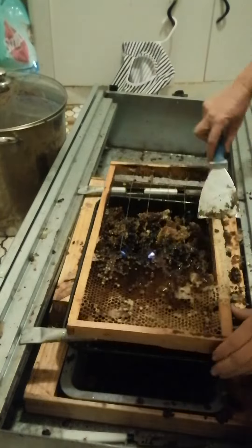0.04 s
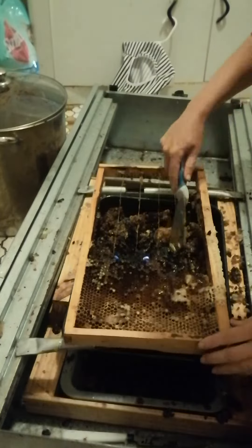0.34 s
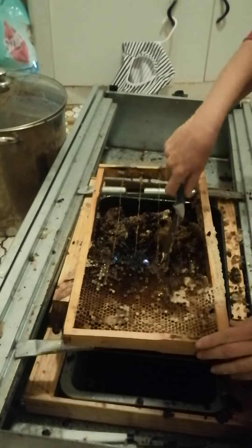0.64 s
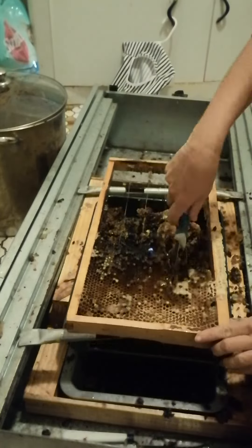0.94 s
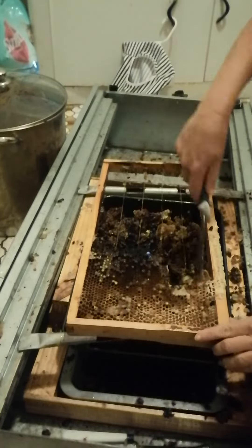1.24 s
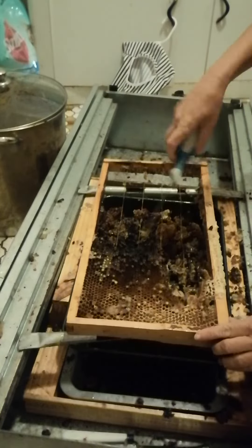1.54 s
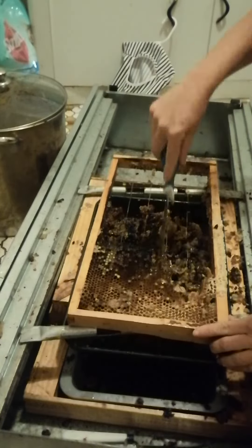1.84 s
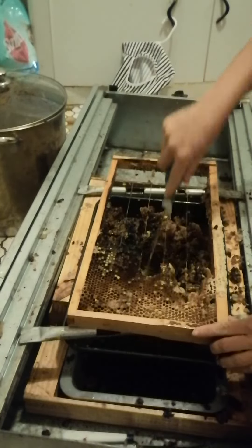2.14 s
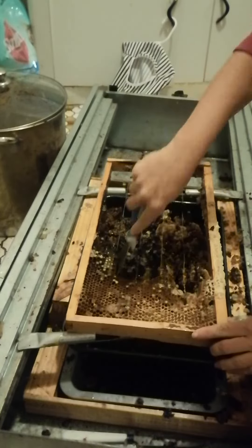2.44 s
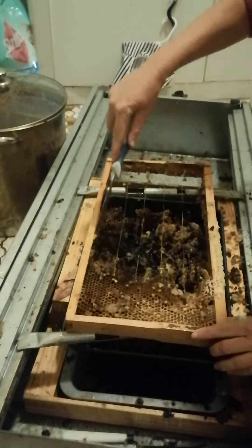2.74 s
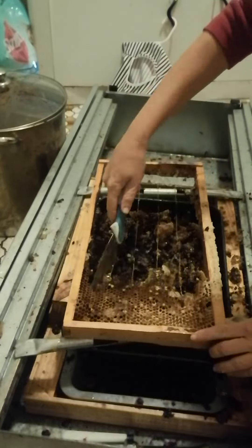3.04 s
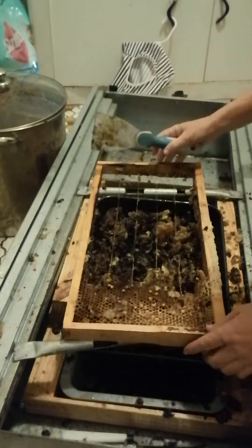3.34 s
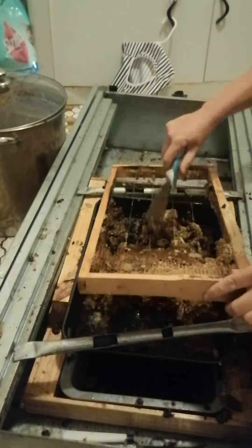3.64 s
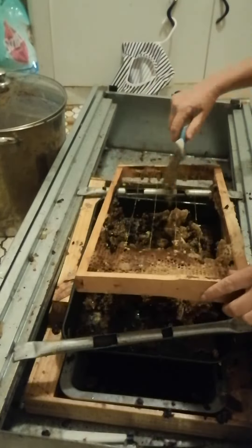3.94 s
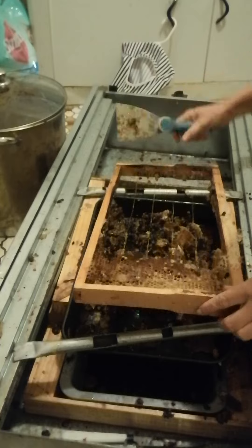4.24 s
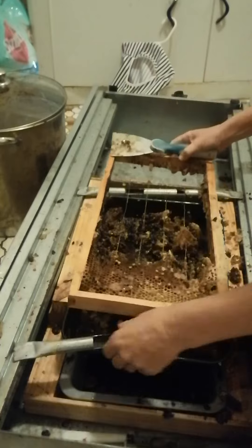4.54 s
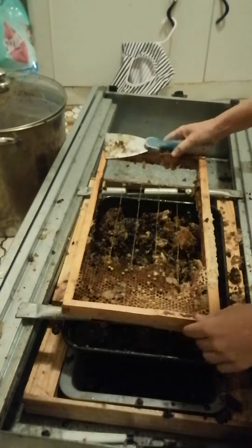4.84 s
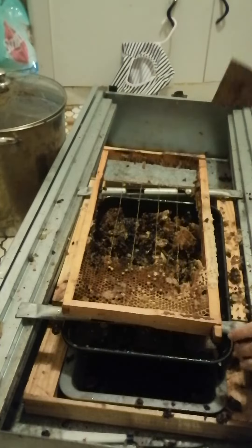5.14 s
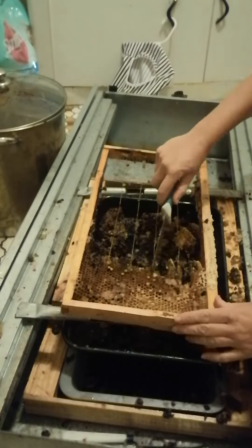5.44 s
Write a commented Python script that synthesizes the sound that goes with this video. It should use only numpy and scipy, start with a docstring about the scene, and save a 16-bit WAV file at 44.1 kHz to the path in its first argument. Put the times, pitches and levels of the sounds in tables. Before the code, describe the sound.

Old honeycomb crunches faintly as a blade cuts it from a wooden frame, with sharp clicks, clacks and dull thumps.

```python
"""Soft wooden bumps and crunching wax: a metal scraper cuts old comb out of a wired beehive frame,
over a tub in a kitchen. The blade snaps off the wires, clacks and knocks on the wood; each blow
is a few contacts and a short rattle ringing a resonant body. Wax crunches as trains of tiny
fractures and chirps by stick-slip. Crumbs drop, the frame bumps on its rests, and a prop slides
under it near the end. Faint appliance hum and room noise lie underneath."""
import sys
import numpy as np
from scipy import signal
from scipy.fft import rfft, irfft
from scipy.io import wavfile
from scipy.ndimage import uniform_filter1d

SR = 44100
rng = np.random.default_rng(int(sys.argv[2]) if len(sys.argv) > 2 else 0)


def log_audio(samples):
    """Write samples as a 16-bit WAV file to the path given in sys.argv[1]."""
    # one column per channel
    frames = np.atleast_2d(samples).T
    # limit to full scale, then quantise
    limited = np.clip(frames, -1, 1)
    pcm = np.round(limited * 32767).astype(np.int16)
    wavfile.write(sys.argv[1], SR, pcm)


N = 251370
EVENT_SAMPLES, LEAD_SAMPLES = 16384, 4096
EVENT_S = (np.arange(EVENT_SAMPLES) - LEAD_SAMPLES) / SR
EVENT_HZ, SCENE_HZ = np.fft.rfftfreq(EVENT_SAMPLES, 1 / SR), np.fft.rfftfreq(N, 1 / SR)
BLOW_SPLITS_HZ, WAX_SPLITS_HZ = (700, 3300), (3300, 7000)

# Event and curve levels are relative: each source adds its own gain.
# Blade blows: (time [s], thump [dB], ring [dB], crack [dB], rattle [dB], rattle t60 [s], L-R [dB])
SNAPS = [(1.1181, -26, -25.5, -38.5, -6.5, 0.043, -0.5), (1.2442, -46, -54, -71, 6, 0.052, 3),
         (1.5852, -60, -49.5, -56, 18, 0.011, 10), (1.8430, -27.5, -28, -40.5, -4.5, 0.042, 3),
         (2.0139, -26, -28.5, -38.5, -3.5, 0.047, 3.5), (3.3388, -50.5, -50, -53.5, 26, 0.045, 0.5)]
CLACKS = [(2.2912, -39, -28.5, -40.5, 0, 0.056, 7.5), (2.6075, -67, -50, -62, 16, 0.046, 0),
          (2.6997, -38, -30.5, -44.5, 0.5, 0.053, 0)]
KNOCKS = [(3.0945, -45, -32.5, -42, 6.18, 0.032, 0), (3.0978, -23, -20, -32.5, 1.5, 0.069, .9)]
# Contacts within a blow: (delay [s], force [relative])
SNAP_CONTACTS = [(0, -0.406), (.0013, 0.59)]
CLACK_CONTACTS = [(0, 0.96), (.0037, 1), (.0079, .65)]
KNOCK_CONTACTS = [(0, 0.81), (.003, 0.32), (.0072, .8), (0.0109, 0.64)]
# Tub, table and wall echoes: (left delay [s], right delay [s], gain [linear])
ECHOES = [(.0012, .00135, -0.71), (.0044, 0.0041, -0.41), (.0076, .0075, -.26), (0.013, .0111, -.2)]
# Blade skims wax: (time [s], length [s], crunch [dB], brightness [dB])
SKIMS = [(.294, .024, -77.5, 20), (0.414, 0.022, -70.5, 10.5), (0.484, 0.027, -67, -2.5),
         (.603, 0.052, -65, 5.5), (0.654, 0.031, -54, -4.5), (0.737, 0.017, -56.5, -5.5),
         (0.783, 0.026, -59, -3.5), (1.228, .031, -63, 1), (1.595, 0.031, -58.5, -6),
         (1.739, 0.025, -69.5, 2), (2.101, 0.018, -65.5, -5.5), (2.165, 0.022, -69, 8.5),
         (2.382, 0.036, -64, 2.5), (2.594, 0.025, -69, 8.5), (3.702, 0.017, -66.5, -2),
         (3.765, 0.021, -59.5, -1.5), (5.643, .021, -72, 10)]
# Frame hits its rests, comb hits the tub: (time [s], length [s], thump [dB], ring [dB])
BUMPS = [(0.03, 0.013, -53.5, -60), (0.842, 0.02, -41, -48.5), (1.421, 0.016, -45, -55.5),
         (1.715, 0.02, -44, -51.5), (2.882, 0.031, -65, -62.5), (3.013, 0.037, -52.5, -60),
         (3.337, 0.018, -37, -46), (3.486, 0.024, -45.5, -68), (3.616, 0.021, -43.5, -48.5),
         (3.833, 0.055, -52, -84), (4.126, 0.022, -58, -63), (4.233, 0.025, -55, -65),
         (4.276, 0.025, -46, -50), (4.543, 0.043, -48, -56), (4.577, 0.023, -44.5, -63),
         (4.619, 0.032, -49.5, -58), (4.771, 0.03, -58.5, -68)]
# Blade digs in, pushing the frame: (time [s], length [s], crunch [dB], brightness [dB], thump [dB])
DIGS = [(0.144, 0.03, -70, 0, -46), (0.328, 0.024, -70.5, 0, -57.5), (0.822, 0.027, -50, -1.5, -41.5),
        (0.907, 0.023, -71, -6, -56.5), (1.067, 0.039, -69.5, -7.5, -54), (1.397, 0.039, -60, -4, -54),
        (1.675, 0.041, -62, -2.5, -54), (2.976, 0.022, -54, -2.5, -31.5), (3.574, 0.03, -55, -2, -40.5),
        (3.939, 0.034, -73.5, -1, -57), (4.042, .023, -47.5, 0, -54), (4.496, .022, -65.5, -2, -54),
        (4.682, 0.025, -69, -7, -48), (5.306, 0.023, -59, 1, -58.5), (5.54, 0.026, -68, 6.5, -60.5)]
# Stick-slip of wax and wood: (time [s], peak [dB], pitch [Hz], half length [s])
CHIRPS = [(0.135, -39, 1950, 0.0011), (0.139, -38.5, 338, 0.0027), (0.646, -35.5, 2470, 0.00024),
          (.7318, -35, 1450, .0012), (0.8004, -24, 1480, 0.00083), (2.805, -46, 3480, .0009),
          (3.019, -48, 490, 0.0088), (3.151, -35.5, 523, .012), (4.046, -47.5, 540, 0.01),
          (4.413, -50.5, 2090, 0.0006)]
# Envelopes of crumbling wax and of the sliding prop: (time [s], level [dB])
CRUMBLE_LEVEL = [(0, -76.5), (.4, -76.5), (.75, -72.5), (1.0, -79.5), (1.3, -94.5), (1.36, -70), (1.5, -78),
                 (1.83, -107), (1.99, -59.5), (2.08, -85), (2.24, -70), (2.52, -81.5), (2.82, -70.5),
                 (3.02, -72.5), (3.3, -78), (4.3, -78), (5.3, -73.5), (5.7, -80.5)]
SLIDE_LEVEL = [(4.85, -105), (4.874, -59), (4.93, -63), (4.985, -72), (5.022, -50), (5.052, -51),
               (5.068, -64.5), (5.13, -67), (5.29, -92), (5.35, -105)]
# Bump position: (time [s], L-R before width scaling [dB])
FRAME_PAN = [(0.0, 3), (0.79, -2.5), (1.92, 8.5), (3.22, -3), (3.38, 3), (3.48, 0.5), (3.62, 0.0),
             (4.51, 2.5), (5.7, -0.5)]
# Broad spectra: (frequency [Hz], relative level [dB])
SNAP_COLOUR = [(50, -22.5), (110, -15), (190, -7.5), (300, -4.5), (430, -1.5), (560, -12.5), (800, -12.5),
               (1150, -5), (1700, -10.5), (2800, -18), (5300, -24.5), (7500, -31), (11000, -39),
               (15000, -54)]
CLACK_COLOUR = [(60, -42), (200, -44.5), (400, -12), (560, -23), (800, -11.5), (1450, -15), (2100, -12.5),
                (2700, -19), (3200, -26), (4200, -39), (6000, -49.5), (10000, -67), (15000, -80)]
KNOCK_COLOUR = [(60, -30.5), (265, -23.5), (350, -1), (520, -3.5), (660, -12.5), (850, -6.5), (2000, -2),
                (2700, -8.5), (3500, -20), (5500, -32.5), (9500, -43), (12000, -61), (15000, -64.5)]
FRAME_COLOUR = [(50, -14), (130, -9), (260, 1), (420, -1), (600, -4.5), (800, -12.5), (1500, -18.5),
                (2300, -21), (3300, -23), (6000, -47)]
WAX_COLOUR = [(200, -26.5), (800, -4.5), (1500, -4), (2400, -2), (3600, 3), (5500, 1.5), (7500, -4.5),
              (9700, -4.5), (12000, -16), (15000, -22.5)]
ROOM_COLOUR = [(15, -36.5), (25, 1.5), (81, 3), (128, 0), (224, -12), (301, -9.5), (515, -10), (1000, -15),
               (1310, -20.5), (1760, -20), (3440, -25.5), (4500, -30.5), (5720, -32.5), (9270, -47.5),
               (15000, -52)]
# Resonances: (frequency [Hz], width [Hz], lift [dB])
SNAP_MODES = [(190, 25, 2.9), (282, 70, 7.3), (387, 42, 4.4), (1076, 39, 1), (1217, 130, 2.2),
              (1530, 37, 1.3), (3850, 190, 5.2), (5000, 780, 4.5)]
CLACK_MODES = [(950, 100, 0.7), (1230, 130, 5.1), (1830, 220, 6.3), (2248, 530, 12.6), (2532, 160, 8.5)]
KNOCK_MODES = [(868, 120, 11), (1107, 47, 6.6), (1428, 100, 5.2), (1740, 170, 4.2), (1880, 70, 6.97),
               (2016, 96, 7.9), (2540, 120, 3.8), (2660, 79, 6), (3200, 94, 4)]
FRAME_MODES = [(335.5, 100, 2.3), (460, 110, 3.7), (930, 92, 5.7), (1075, 16, 1), (2180, 121, 4.6)]
WAX_MODES = [(3550, 220, 1.5), (5240, 470, 5.3), (7310, 352, 2.957), (9020, 1800, 1.9)]
# Appliance tones: (frequency [Hz], rms level [dB])
HUM_TONES = [(64.6, -76), (2148, -94), (3558, -90)]
# Stereo phase: (frequency [Hz], left lead [rad])
STEREO_PHASE = [(1700, 0), (2400, -.6), (3400, -2.2), (5300, -2.8), (6100, -.3), (9000, 0)]
# Stereo balance: (frequency [Hz], L-R [dB])
STEREO_BALANCE = [(60, 1), (150, 3), (300, 3), (600, -4.5), (1200, -0.5), (2500, -2.5), (5000, 1.5),
                  (8000, 2), (12000, -2)]


def wire_snaps():
    """A wire drags on the blade, then lets go."""
    out = blows(SNAPS, SNAP_CONTACTS, body(SNAP_COLOUR, SNAP_MODES),
                gain_db=-.52, rattle_db=8, chatter_s=.0025, room_db=-35.5, ripple_db=3.2)
    out += run_up(SNAPS, before_s=.016, length_s=.0473, crunch_db=-40.5, bright_db=0)
    return out + settling(SNAPS, after_s=.026, length_s=.024,
                          drop_db=-14, dull_db=-6, crunch_db=-30.5, bright_db=-6.5)


def edge_clacks():
    """The hard blade bounces on the frame's edge."""
    out = blows(CLACKS, CLACK_CONTACTS, body(CLACK_COLOUR, CLACK_MODES),
                gain_db=-.9, rattle_db=5, chatter_s=.0018, room_db=-30.5, ripple_db=3.2)
    out += run_up(CLACKS, before_s=.056, length_s=.045, crunch_db=-31.5, bright_db=3)
    return out + settling(CLACKS, after_s=.07, length_s=.037,
                          drop_db=-10.5, dull_db=-12.5, crunch_db=-42, bright_db=4)


def side_knock():
    """A graze, then a hard blow on the side bar."""
    out = blows(KNOCKS, KNOCK_CONTACTS, body(KNOCK_COLOUR, KNOCK_MODES),
                gain_db=-1.43, rattle_db=5.5, chatter_s=.0081, room_db=-30.5, ripple_db=0)
    return out + settling(KNOCKS[1:], after_s=.055, length_s=.024,
                          drop_db=-15.5, dull_db=-15, crunch_db=-50.5, bright_db=-.5)


def blows(rows, contacts, response, gain_db, rattle_db, chatter_s, room_db, ripple_db):
    """Sharp contacts, near echoes, a rattle and a faint room tail ring one body."""
    out = np.zeros((2, N))
    jw = 2j * np.pi * EVENT_HZ
    paths = 1 + sum(gain * np.exp(-jw * np.array([[left], [right]])) for left, right, gain in ECHOES)
    forces = sum(force * np.exp(-jw * (delay_s - EVENT_S[0])) for delay_s, force in contacts)
    contact = irfft(paths * forces / (1 + 1j * EVENT_HZ / 4500))  # wax softens the edge
    onset = np.clip(1 + EVENT_S / .0015, 0, 1)
    for time_s, thump_db, ring_db, crack_db, loose_db, t60_s, pan_db in rows:
        rattle = noise_tail(t60_s, hold_s=chatter_s, width=.7)
        room = noise_tail(t60_s=.31, hold_s=0, width=.88)
        drive = contact + amp(loose_db + rattle_db) * rattle + amp(room_db) * room
        sound = resonate(drive, response * ripple(ripple_db, spacing_hz=180), BLOW_SPLITS_HZ,
                         (thump_db, ring_db, crack_db), start_s=-.002, end_s=.028)
        add(out, time_s, amp(gain_db) * onset * panned(sound, pan_db))
    return out


def run_up(rows, before_s, length_s, crunch_db, bright_db):
    """The blade cuts wax just before each blow; level relative to its ring."""
    out = np.zeros((2, N))
    for time_s, _, ring_db, *_ in rows:
        add(out, time_s - before_s, scrape(length_s, ring_db + crunch_db, bright_db))
    return out


def settling(rows, after_s, length_s, drop_db, dull_db, crunch_db, bright_db):
    """The frame drops back and the comb crunches; levels relative to each blow."""
    out = np.zeros((2, N))
    for time_s, thump_db, ring_db, *_ in rows:
        drop = bump(time_s, length_s, thump_db + drop_db, thump_db + drop_db + dull_db)
        add(out, time_s + after_s, drop + scrape(length_s, ring_db + crunch_db, bright_db))
    return out


def strokes():
    """Skims crunch, bumps thump, digs do both."""
    out = np.zeros((2, N))
    for time_s, length_s, crunch_db, bright_db in SKIMS:
        add(out, time_s, scrape(length_s, crunch_db, bright_db))
    for time_s, length_s, thump_db, ring_db in BUMPS:
        add(out, time_s, bump(time_s, length_s, thump_db, ring_db))
    for time_s, length_s, crunch_db, bright_db, thump_db in DIGS:
        crunch = scrape(length_s, crunch_db, bright_db)
        add(out, time_s, crunch + bump(time_s, length_s, thump_db, ring_db=thump_db - 4.5))
    return out


def scrape(length_s, crunch_db, bright_db, gain_db=-1):
    """A stroke crushes thin cell walls in uneven clumps."""
    pressure, span_s = swell(length_s, shape=1.22)
    clumps = amp(2.2 * unit_rms(uniform_filter1d(rng.standard_normal(EVENT_SAMPLES), 110)))
    drive = stereo(grains(EVENT_SAMPLES, spread_db=2), width=.65) * clumps * pressure
    response = body(WAX_COLOUR, WAX_MODES) * ripple(2.5, spacing_hz=259.6)
    bands_db = crunch_db + np.array([-2.5 - bright_db, 0, -6 + bright_db])
    return amp(gain_db) * resonate(drive, response, WAX_SPLITS_HZ, bands_db, *span_s)


def bump(time_s, length_s, thump_db, ring_db, gain_db=-3, pan_width=.89):
    """Wax cushions the contact: a soft cluster of small blows drives the frame."""
    pressure, span_s = swell(length_s, shape=1.86)
    drive = stereo(grains(EVENT_SAMPLES, spread_db=3), width=.7) * pressure
    response = body(FRAME_COLOUR, FRAME_MODES)
    sound = resonate(drive, response, BLOW_SPLITS_HZ, (thump_db, ring_db), *span_s)
    return amp(gain_db) * panned(sound, pan_width * at_time(FRAME_PAN, time_s))


def stick_slip(tail_db, t60_s):
    """A brief pitched pulse as a sticky contact lets go, scattered by the tub."""
    out = np.zeros((2, N))
    for time_s, peak_db, hz, half_s in CHIRPS:
        pulse = amp(peak_db) * np.exp(-(EVENT_S / half_s) ** 2) * np.cos(2 * np.pi * hz * EVENT_S)
        scatter = rng.standard_normal((2, EVENT_SAMPLES)) * amp(-60 * (EVENT_S - EVENT_S[0]) / t60_s)
        tail = signal.fftconvolve(pulse[None], scatter / np.linalg.norm(scatter[0]), axes=1)
        add(out, time_s, pulse + amp(tail_db) * tail[:, :EVENT_SAMPLES])
    return out


def crumbling(envelope, gain_db, spread_db, tilt_db_per_oct, clump_db, clump_s):
    """A clumpy stream of tiny wax fractures follows an envelope."""
    slow_noise = irfft(rfft(rng.standard_normal(N)) * np.exp(-(SCENE_HZ * clump_s) ** 2), N)
    drive = stereo(grains(N, spread_db), width=.666) * amp(clump_db * unit_rms(slow_noise))
    colour_db = at_hz(WAX_COLOUR, SCENE_HZ) + tilt_db_per_oct * np.log2(SCENE_HZ + 1)
    sound = irfft(rfft(drive) * amp(colour_db), N)
    return unit_rms(sound) * amp(gain_db + at_time(envelope, np.arange(N) / SR))


def crumbs(count, length_s, gain_db, dull_db, vary_db):
    """Bits of comb fall into the tub at random; level follows the crumbling."""
    out = np.zeros((2, N))
    for slot, (jitter, softness) in enumerate(rng.random((count, 2))):
        time_s = (slot + jitter) / count * N / SR
        thump_db = at_time(CRUMBLE_LEVEL, time_s) + gain_db - vary_db * softness
        add(out, time_s, bump(time_s, length_s, thump_db, thump_db + dull_db))
    return out


def kitchen(noise_db, waver_rad):
    """Steady room noise, nearly mono in the bass, and a wavering appliance hum."""
    noise = rfft(rng.standard_normal((3, N)))
    width = at_hz([(60, .099), (400, 1.2), (2000, 3)], SCENE_HZ)
    spectrum = (noise[0] + width * noise[1:]) / np.sqrt(1 + width ** 2 / 2)
    air = irfft(spectrum * amp(at_hz(ROOM_COLOUR, SCENE_HZ)), N)
    time_s = np.arange(N) / SR
    drift_rad = waver_rad * np.interp(time_s, np.linspace(0, time_s[-1], 40), rng.standard_normal(40))
    hum = sum(amp(db) * np.sqrt(2) * np.sin(2 * np.pi * hz * time_s + drift_rad) for hz, db in HUM_TONES)
    return amp(noise_db) * unit_rms(air) + hum


def body(colour, modes):
    """Minimum-phase stereo response of a resonant object."""
    peaks_db = sum(lift_db / (1 + (2 * (EVENT_HZ - hz) / width_hz) ** 2)
                   for hz, width_hz, lift_db in modes)
    log_gain = np.log(amp(at_hz(colour, EVENT_HZ) + peaks_db))
    mirrored = np.r_[log_gain, log_gain[-2:0:-1]]
    response = np.exp(np.conj(signal.hilbert(mirrored)))[:len(EVENT_HZ)]
    return response * amp(at_hz(STEREO_BALANCE, EVENT_HZ) * np.array([[.5], [-.5]]))


def ripple(depth_db, spacing_hz):
    """Random spectral ripple: the response varies with the point of contact."""
    knots_hz = np.arange(0, SR / 2, spacing_hz)
    heights = stereo(rng.standard_normal((3, 800))[:, :len(knots_hz)], width=.98)
    return amp(depth_db * np.array([np.interp(EVENT_HZ, knots_hz, side) for side in heights]))


def resonate(drive, response, splits_hz, bands_db, start_s, end_s):
    """A force rings a body. Sets band rms over the span, low to high; bands with no level are muted."""
    low, below_top = (1 / (1 + (EVENT_HZ / hz) ** 8) for hz in splits_hz)
    spectrum = rfft(drive) * response
    span = (EVENT_S >= start_s) & (EVENT_S <= end_s)
    out = 0
    for mask, db in zip((low, below_top - low, 1 - below_top), bands_db):
        band = irfft(spectrum * mask)
        out = out + amp(db) * band / np.sqrt(np.mean(band[:, span] ** 2) + 1e-20)
    return out


def noise_tail(t60_s, hold_s, width):
    """Stereo noise that holds from time zero, then decays."""
    envelope = (EVENT_S > 0) * amp(-60 * np.maximum(EVENT_S - hold_s, 0) / t60_s)
    return stereo(rng.standard_normal((3, EVENT_SAMPLES)), width) * envelope / np.linalg.norm(envelope)


def swell(length_s, shape):
    """Pressure builds to time zero and lets go; returns envelope and span."""
    rise_s, fade_s = .45 * length_s, .55 * length_s
    return np.exp(-abs(EVENT_S / np.where(EVENT_S < 0, rise_s, fade_s)) ** shape), (-rise_s, fade_s)


def grains(samples, spread_db):
    """Three dense trains of uneven micro-fractures."""
    strength = amp(spread_db * np.minimum(rng.exponential(1, (3, samples)), 4))
    return unit_rms(rng.standard_normal((3, samples)) * strength * (rng.random((3, samples)) < .2))


def stereo(three, width):
    """Two channels from one shared and two independent signals."""
    return unit_rms(three[0] + width * three[1:])


def panned(x, pan_db):
    """Constant-power pan, positive left."""
    return x * unit_rms(amp([[pan_db / 2], [-pan_db / 2]]))


def add(mix, time_s, sound):
    """Mixes in an event with its time zero at time_s."""
    start = round(time_s * SR) - LEAD_SAMPLES
    sound = sound[:, max(-start, 0):]
    part = mix[:, max(start, 0):][:, :sound.shape[1]]
    part += sound[:, :part.shape[1]]


def at_hz(points, hz):
    """Log-frequency interpolation."""
    knots_hz, values = np.transpose(points)
    return np.interp(np.log(hz + 1), np.log(knots_hz + 1), values)


def at_time(points, time_s):
    """Linear interpolation."""
    return np.interp(time_s, *np.transpose(points))


def amp(db):
    """dB to gain."""
    return 10 ** (np.asarray(db) / 20)


def unit_rms(x):
    """Scales to rms 1."""
    return x / np.sqrt(np.mean(x ** 2) + 1e-20)


def scene():
    """Work on the frame, phase-shifted between channels, over the kitchen background."""
    work = wire_snaps() + edge_clacks() + side_knock()
    work += crumbling(CRUMBLE_LEVEL, gain_db=.5, spread_db=1,
                      tilt_db_per_oct=1, clump_db=2.5, clump_s=.016)
    work += crumbling(SLIDE_LEVEL, gain_db=3, spread_db=1.5,
                      tilt_db_per_oct=-.5, clump_db=2.25, clump_s=.015)
    work += stick_slip(tail_db=-3.5, t60_s=.036)
    work += crumbs(count=26, length_s=.053, gain_db=11.5, dull_db=-5.5, vary_db=6)
    work += strokes()
    phase_rad = at_hz(STEREO_PHASE, SCENE_HZ) * np.array([[.5], [-.5]])
    work = irfft(rfft(work) * np.exp(1j * phase_rad), N)
    return work + kitchen(noise_db=-62.4, waver_rad=.802)


def record(dry):
    """Low-pass at 15350 Hz."""
    taps = signal.firwin(401, 15350, window=("kaiser", 8), fs=SR)
    return signal.oaconvolve(dry, taps[None], "same")


dry = scene()
out = record(dry)
log_audio(out)
```